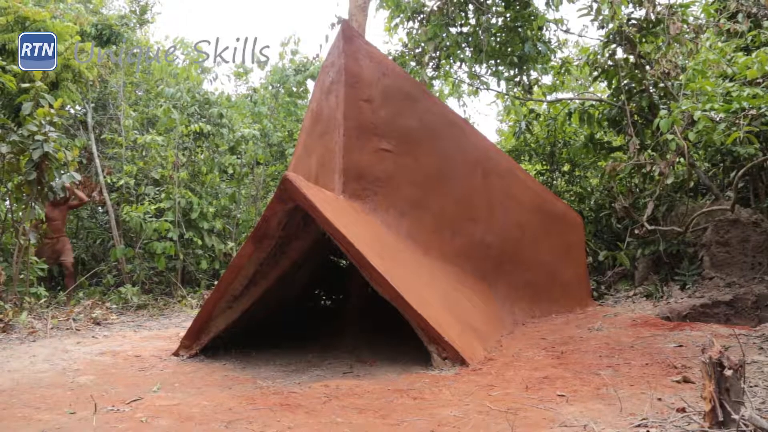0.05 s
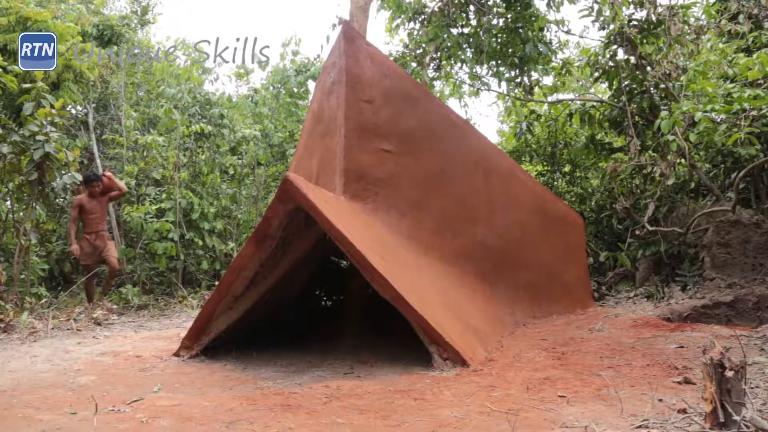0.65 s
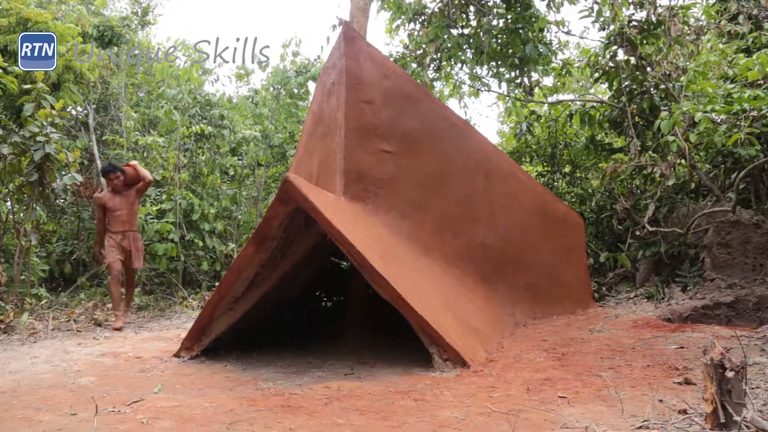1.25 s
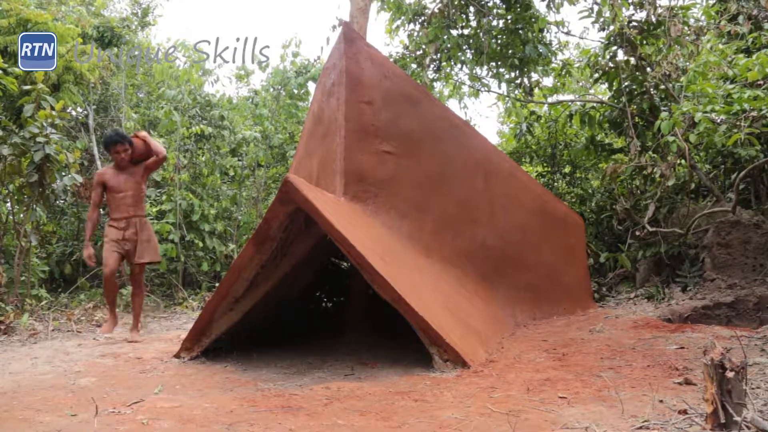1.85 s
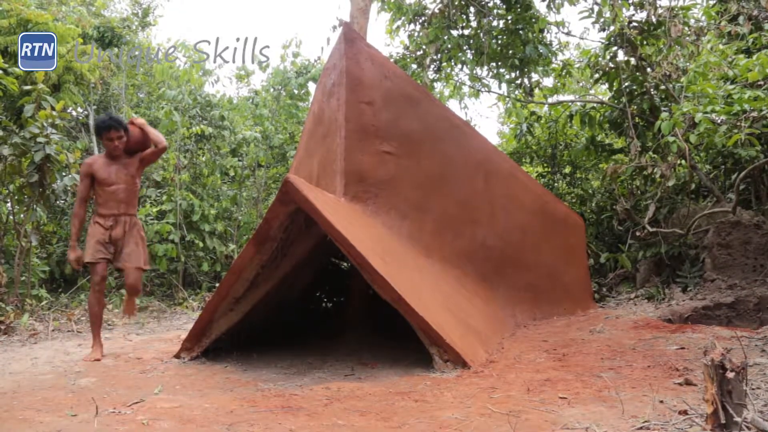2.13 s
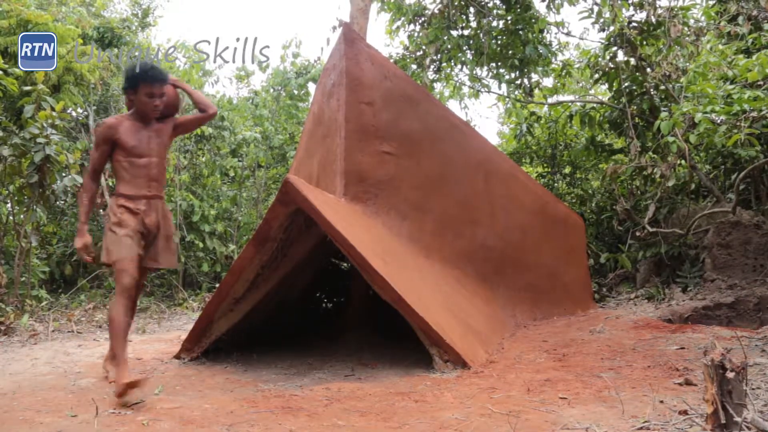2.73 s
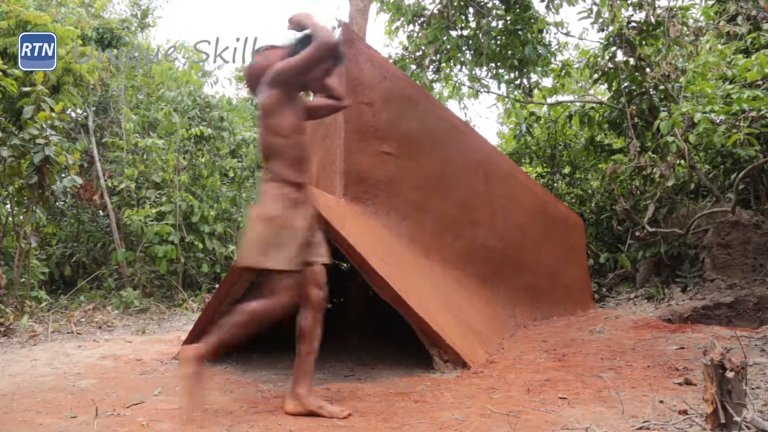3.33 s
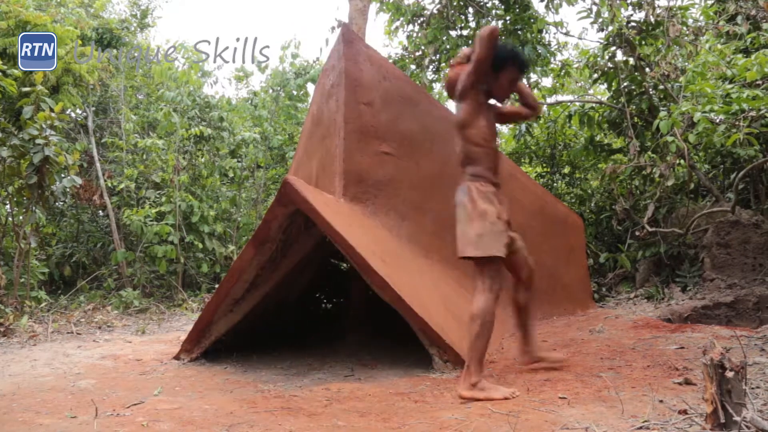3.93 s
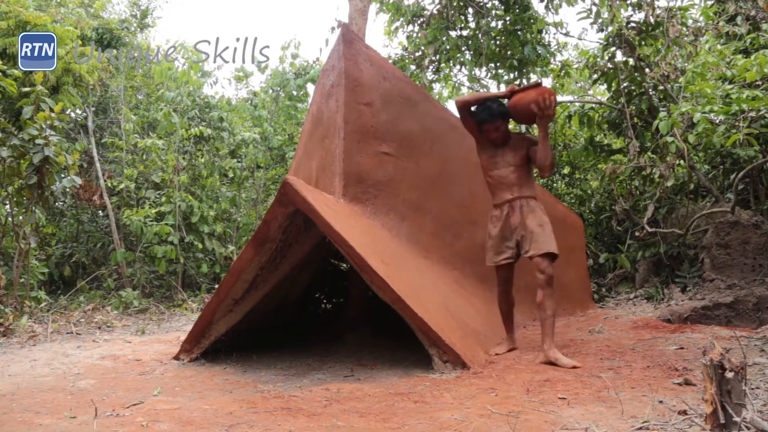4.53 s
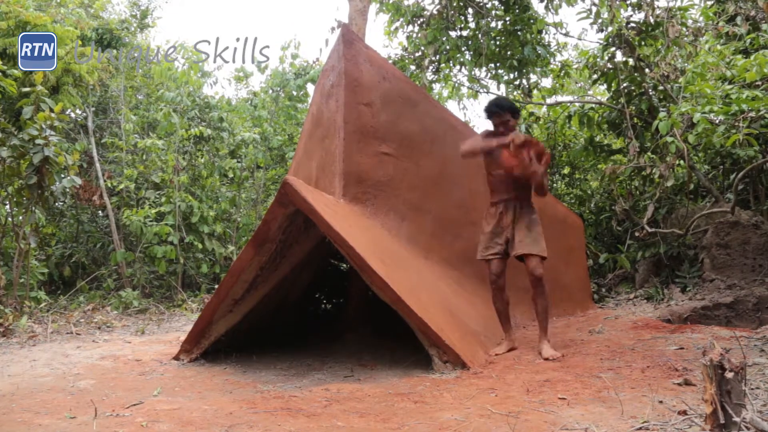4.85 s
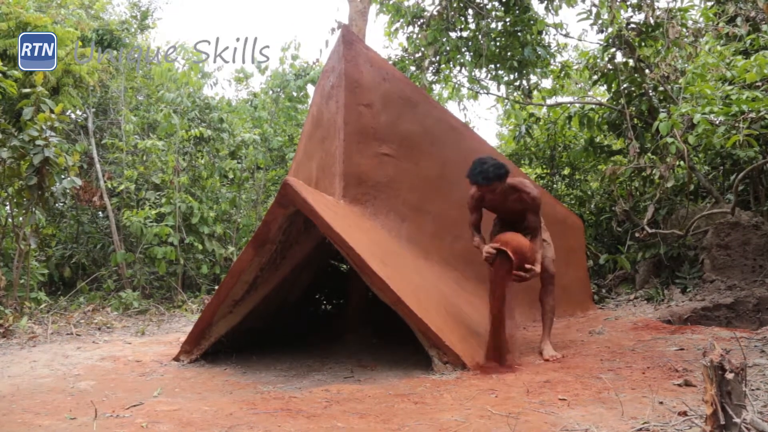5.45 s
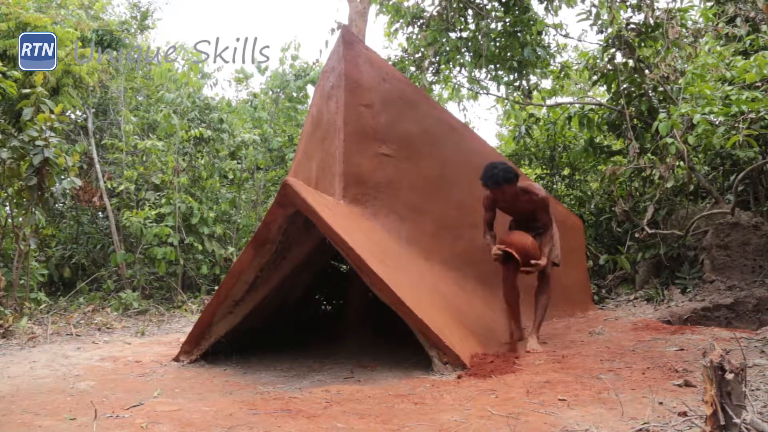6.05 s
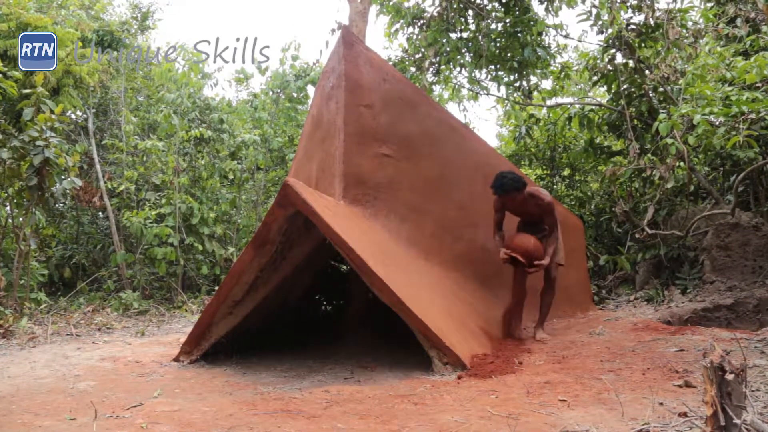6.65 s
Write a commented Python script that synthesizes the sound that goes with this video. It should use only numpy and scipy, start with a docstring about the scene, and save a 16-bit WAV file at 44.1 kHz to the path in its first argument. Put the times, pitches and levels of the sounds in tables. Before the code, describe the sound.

In a forest with a steady drone, dry ticks and a faint throbbing insect, a bird chirps once and leafy branches rustle, swelling to a loud swish. Soft barefoot steps and gritty scuffs follow. The bird returns with a short gliding phrase, and two sharp slaps land on a clay pot. Then loose dry soil is tipped onto the earth, trickling and pattering with small dull clods.

```python
"""Leaves swish and a small bird whistles as a barefoot man pushes through forest undergrowth.
He crosses a clearing with thudding heels, slaps a clay pot twice and tips out dry soil, whose crumbs
and clods patter on the ground. Rustle and patter are dense trains of random impacts; thuds and the
pot's ring are damped modes. The bird returns with five gliding notes, and behind it all are dry
ticking, a pulsing insect and a steady drone."""
import sys
import numpy as np
from scipy import signal
from scipy.fft import rfft, irfft
from scipy.io import wavfile
from scipy.ndimage import uniform_filter1d

SR = 44100
rng = np.random.default_rng(int(sys.argv[2]) if len(sys.argv) > 2 else 0)


def materialize(psi):
    """Save the field psi as 16-bit PCM at rate SR to the path in sys.argv[1].

    A 1-D psi becomes a single channel; in a 2-D psi each row is a channel.
    """
    bounded = np.clip(np.atleast_2d(psi).T, -1, 1)
    quanta = np.round(bounded * 32767).astype(np.int16)
    wavfile.write(sys.argv[1], SR, quanta)


N = 295029
T = np.arange(N) / SR


# spectrum of rustling leaves: f/Hz, relative level/dB
LEAF_SPECTRUM = [(40, -36), (80, -29), (150, -20), (420, -15.5), (550, -9.5), (900, -7.5), (1480, -1.5),
                 (2400, -4.5), (4240, 2), (6000, 3), (9260, -5), (15100, -15), (16000, -24)]
# twigs whipping back: t/s, relative level/dB, duration/s
TWIG_WHIPS = [(0.0, -30, 0.015), (.518, -25.5, 0.04), (.631, -31, 0.038), (.68, -33, 0.0098),
              (.922, -29.5, 0.053), (1.215, -22, 0.011), (1.24, -29.5, 0.012), (1.530, -17, 0.044),
              (1.629, -15, 0.0066), (1.641, -17.5, 0.0084), (1.671, -21.5, 0.032), (1.72, -26, 0.042),
              (2.135, -31.5, 0.028), (2.346, -33, 0.0065)]
def undergrowth():
    """Superposition of impacts: countless leaf contacts merge into a rustle as branches drag and whip."""
    leaves = grains(per_s=8000, spread_db=3.5) + 0.25 * grains(per_s=180, spread_db=-3.5)
    crackle = coloured(leaves, LEAF_SPECTRUM) * gain_of(1.2 * wander(47))
    whips = strokes(TWIG_WHIPS, rise=0.12)
    rustle = crackle * np.hypot(gain_of(4) * brushing(), gain_of(-3) * whips)
    return rustle + gain_of(-14) * forest_echoes(rustle, t60=0.095)


# leafy branches dragged along the body: t/s, duration/s, relative level/dB
BRANCH_DRAGS = [(-0.02, 0.13, -47), (0.315, 0.031, -41.5), (0.41, 0.28, -43), (0.785, 0.23, -46.5),
                (1.11, 0.15, -46), (1.34, 0.026, -38.5), (2.49, 0.037, -55)]
def brushing(bush_s=1.601):
    """Incoherent sources add in power: the envelope of single branches, a thick bush and settling leaves."""
    before, after = np.maximum(bush_s - T, 0), np.maximum(T - bush_s, 0)
    swell = gain_of(-74 * before)  # slopes in dB/s
    fade, settling = gain_of(-29 - 64 * after), gain_of(-42 - 21 * after)
    branches = held(BRANCH_DRAGS, attack_s=0.014, release_s=0.047)
    return np.hypot(branches, swell * np.hypot(fade, settling))


# rubs of soles and cloth: t/s, level/dB, duration/s
SCUFF_STROKES = [(2.925, -39, 0.017), (3.255, -53, 0.0091), (3.33, -46, 0.0099), (3.585, -41, 0.049),
                 (3.705, -35, 0.023), (3.748, -40, 0.01), (4.145, -43.5, .03), (4.452, -49, 0.091),
                 (4.872, -40, 0.047), (5.2, -46, 0.026), (5.575, -49, 0.045), (5.82, -43, 0.05),
                 (6.228, -45, 0.037), (6.425, -39, 0.084)]
# their spectrum: f/Hz, relative level/dB
SCUFF_SPECTRUM = [(300, -7), (1500, 4), (4000, 9.5), (7000, 2), (10500, -6), (13000, -9), (16000, -21)]
def scuffs():
    """Friction noise: sliding soles and cloth catch in many tiny, gritty contacts."""
    return strokes(SCUFF_STROKES, rise=0.073) * coloured(grains(per_s=6400, spread_db=3.5), SCUFF_SPECTRUM)


# heels and heavy clods on packed earth: t/s, level/dB, f/Hz
EARTH_IMPACTS = [(0.896, -50, 96), (1.145, -37.5, 226), (2.89, -48, 80), (2.894, -34, 272),
                 (3.709, -24, 590), (3.709, -34.5, 270), (4.072, -34, 310), (5.444, -24.5, 370),
                 (5.776, -37.5, 186), (6.055, -29.5, 250), (6.214, -35, 217), (6.361, -18, 624),
                 (6.477, -33.5, 224)]
# the earth's give under them: frequency ratio, relative level/dB
EARTH_MODES = [(1, 0), (0.534, -16)]
def thuds(decay_cycles=13.3):
    """Constant-Q damping: each mode of the struck earth falls 60 dB in the same number of cycles."""
    out, t = np.zeros(N), np.arange(SR // 4) / SR
    onset = 1 - np.exp(-t / 0.004)
    for s, db, pitch in EARTH_IMPACTS:
        for ratio, mode_db in EARTH_MODES:
            hz = ratio * pitch
            rumble = unit_rms(resonate(rng.standard_normal(len(t)), hz, 0.76 * hz))
            push = np.sin(2 * np.pi * hz * t) + 0.45 * rumble
            add(out, s, gain_of(db + mode_db - 60 * t * hz / decay_cycles) * push * onset)
    return out


# hollow ring of the clay pot: f/Hz, relative level/dB, T60/s
CLAY_MODES = [(335, -6.5, 0.077), (905, 0, 0.023), (1230, 5, 0.03), (1990, -4, 0.043)]
# slaps: t/s, level/dB, f/Hz, bandwidth/Hz, relative tail level/dB, tail T60/s, ring level/dB
HAND_SLAPS = [(4.7252, -9.5, 3580, 2400, -24, 0.15, -34), (5.0452, -10.5, 2450, 1220, -12.5, 0.022, -46)]
def pot():
    """Free vibration: a hand's sharp slap leaves the full pot ringing briefly in its damped modes."""
    out, t = np.zeros(N), np.arange(SR // 6) / SR
    ring = sum(gain_of(db - 60 * t / t60) * np.sin(2 * np.pi * hz * t) for hz, db, t60 in CLAY_MODES)
    for s, db, hz, width, tail_db, t60, ring_db in HAND_SLAPS:
        add(out, s, knock(db, hz, width, tail_db, t60))
        add(out, s, gain_of(ring_db) * ring)
    return out


# spectrum of landing soil: f/Hz, relative level/dB
SOIL_SPECTRUM = [(40, -30), (80, -16), (140, -9), (300, -1), (400, -7.5), (470, -10), (640, 0.5),
                 (1000, -4.5), (1600, -3), (2300, -7), (4300, -4.5), (8000, -20), (13000, -23),
                 (16000, -44)]
# one surge for each tip or shake of the pot: t/s, duration/s, relative level/dB
SOIL_SURGES = [(5.325, 0.18, -43.5), (5.66, 0.19, -52.5), (6.04, 0.17, -57.5), (6.21, 0.063, -46.5),
               (6.34, 0.07, -49.5), (6.52, 0.15, -53)]
def soil(trickle_start_s=5.32):
    """Shot noise: fine crumbs hiss and larger ones patter, landing in surges over a thin trickle."""
    crumbs, lumps = grains(per_s=7000, spread_db=2.8), grains(per_s=420, spread_db=2.6)
    stream = coloured(crumbs + 1.2 * lumps, SOIL_SPECTRUM)
    surges = held(SOIL_SURGES, attack_s=0.015, release_s=0.019)
    trickle = gain_of(-57) * (T > trickle_start_s)
    return np.hypot(surges, trickle) * stream * gain_of(5 + 2.84 * wander(57))


# twigs and grit snapping, and a foot's sharp slap at 3.71 s: t/s, level/dB, f/Hz
TWIG_SNAPS = [(1.147, -19.5, 3050), (1.162, -18, 3500), (1.974, -21, 6000), (2.1942, -27, 5660),
              (2.926, -29, 3500), (3.7114, -20.5, 1000), (5.393, -17.5, 1660), (5.4353, -17, 2600)]
# clods bursting on the ground: t/s, level/dB, f/Hz
CLOD_BURSTS = [(5.3158, -19.5, 925), (5.468, -21.5, 1790), (5.510, -23, 1390), (6.102, -26, 945),
               (6.2142, -23.5, 690), (6.233, -21, 1370), (6.287, -24.5, 1200), (6.32, -25.5, 630),
               (6.36, -21, 800), (6.387, -25.5, 800), (6.518, -23.5, 3050), (6.532, -24, 700),
               (6.558, -27.5, 800), (6.63, -25.5, 644), (6.638, -31, 745)]
def snaps_and_clods():
    """Brittle fracture: twigs and grit snap cleanly and a foot slaps sharply; clods land duller and crumble in
    a stronger tail."""
    out = np.zeros(N)
    for s, db, hz in TWIG_SNAPS:
        add(out, s, knock(db, hz, width_hz=hz, tail_db=-19.5, t60=0.043))
    for s, db, hz in CLOD_BURSTS:
        add(out, s, knock(db, hz, width_hz=1.15 * hz, tail_db=-9, t60=0.032))
    return out


# arched notes: start t/s, crest t/s, end t/s, relative level/dB at opening and at crest,
# opening foot f/Hz, crest f/Hz, closing foot f/Hz, rise time/s
BIRD_NOTES = [(0.0, 0.1, 0.175, -44, -43, 2490, 2720, 1780, 0.04),
              (3.85, 3.945, 4.048, -51, -47, 1850, 2630, 2600, 0.1),
              (4.185, 4.282, 4.405, -48, -42, 2810, 3020, 2440, 0.028),
              (4.495, 4.517, 4.55, -48, -47.5, 2120, 2180, 1300, 0.02),
              (4.592, 4.71, 4.718, -46, -44, 1250, 3060, 3000, 0.118),
              (4.78, 4.94, 5.003, -52, -42.5, 2330, 2660, 1750, 0.06)]
def bird(fall_s=0.049, closing_db=-3.5):
    """Frequency modulation: a nearly pure whistle arches over a crest, quavers and echoes off the trees."""
    song, quaver = np.zeros(N), 1 + 0.0059 * wander(120)
    for start, crest, end, open_db, crest_db, open_hz, crest_hz, close_hz, rise_s in BIRD_NOTES:
        t = np.arange(start, end, 1 / SR) - crest
        opening = [open_hz, rise_s, crest - start, open_db - crest_db]
        closing = [close_hz, fall_s, end - crest, closing_db]
        foot_hz, glide_s, span_s, edge_db = np.where(t[:, None] < 0, opening, closing).T
        pitch = (foot_hz + (crest_hz - foot_hz) * np.exp(-(t / glide_s) ** 2)) * quaver[:len(t)]
        tone = np.sin(2 * np.pi * np.cumsum(pitch) / SR) * signal.windows.tukey(len(t), .12)
        add(song, start, np.sqrt(2) * gain_of(crest_db + edge_db * (t / span_s) ** 2) * tone)
    song *= gain_of(2 * wander(41))  # the level flutters
    return gain_of(-2.5) * song + gain_of(-6.5) * forest_echoes(song, t60=0.35)


# dry ticks of equal strength: t/s
TICK_TIMES = [0.233, 0.2712, 0.3073, 0.4424, 0.733, 0.8378, 1.0164, 1.0482, 2.537, 2.642, 2.9954, 3.1322,
              3.2823, 3.3547, 3.4188, 3.5238, 3.6713, 3.882, 4.0564, 4.126, 4.225, 4.2598, 4.371, 4.447,
              4.655, 4.8299, 5.0663, 5.1493, 5.2817, 5.7555, 5.7857, 5.82, 6.0402, 6.066, 6.6008]
def ticking(tick_db=-39.5, faint_db=-46, faint_per_s=5, whirr_db=-55):
    """Impulsive excitation: rasping ticks, fainter random ones and a fine whirr ring the same resonances."""
    t = np.arange(SR // 50) / SR
    whirr = grains(per_s=900, spread_db=2.8)
    out = gain_of(whirr_db + wander(18)) * unit_rms(tick_body(whirr))
    faint_times = rng.uniform(0, T[-1], int(faint_per_s * T[-1]))
    for times, db in (TICK_TIMES, tick_db), (faint_times, faint_db):
        for s in times:
            rasp = tick_body(rng.choice([-1, 1], len(t)) * np.exp(-t / .0042))
            onset_rms = np.sqrt(np.mean(rasp[:SR // 200] ** 2))  # first 5 ms
            add(out, s + 0.00099, gain_of(db) * rasp / onset_rms)
    return out


# resonances of the ticks and whirr: f/Hz, bandwidth/Hz, relative level/dB
TICK_RESONANCES = [(1195, 370, 0), (1402, 75, 10.5), (1741, 56, 10), (2100, 120, -12), (2155, 144, 4.5),
                   (2880, 59, 3.5), (3243, 100, 9.5), (3800, 100, 5), (3770, 180, 0), (4254, 140, 6),
                   (4865, 96, 10.5), (4930, 960, 2)]
def tick_body(drive):
    """Modal superposition: parallel resonances of alternating polarity colour the ticking."""
    rung = sum(gain_of(db) * resonate(drive, hz, width) * (-1) ** k
               for k, (hz, width, db) in enumerate(TICK_RESONANCES))
    return signal.sosfilt(signal.butter(2, [1000, 6000], "band", fs=SR, output="sos"), rung)


# the insect's pulsing: t/s, throb rate/Hz
INSECT_THROBS = [(0, 5.6), (3.4, 5.72), (3.7, 5.2), (4.6, 5.35), (6.69, 5.6)]
def insect(pitch_hz=5550, swing_hz=340, crest_s=3.47, db=-57):
    """Joint amplitude and frequency modulation: a narrow-band buzz swells and rises with each throb."""
    cycles = np.cumsum(np.interp(T, *np.transpose(INSECT_THROBS))) / SR
    throb = np.cos(2 * np.pi * (cycles - np.interp(crest_s, T, cycles)))
    carrier = np.exp(2j * np.pi * np.cumsum(pitch_hz + swing_hz * throb) / SR)
    buzz = ((wander(800) + 1j * wander(800)) * carrier).real  # a noise band around the carrier
    buzz = signal.sosfilt(signal.butter(12, 6500, fs=SR, output="sos"), buzz)
    swell = gain_of(2.6 * throb + 1.1 * wander(12))
    return gain_of(db) * unit_rms(buzz * swell)


# spectrum of the forest's drone: f/Hz, relative level/dB
DRONE_SPECTRUM = [(15, -40), (25, -13), (45, -8.5), (66, 1.5), (115, 2), (300, -2), (420, -3.5),
                  (620, -2.5), (1100, -7), (1650, 1.5), (2550, -11.5), (3250, 0.5), (3920, -12.5),
                  (4250, -1.5), (4610, -29), (5600, -4.5), (7110, -19.5), (14000, -24), (16000, -24)]
def drone(db=-50.5):
    """Broadband noise: the distant wash of the forest, wavering slightly in level."""
    return gain_of(db + 1.9 * wander(21)) * coloured(rng.standard_normal(N), DRONE_SPECTRUM)


def forest_echoes(x, t60):
    """Scattering: trunks and foliage return sparse echoes that build up and decay exponentially."""
    t = np.arange(SR // 2) / SR
    echoes = rng.standard_normal(len(t)) * (rng.random(len(t)) < .05)
    echoes *= gain_of(-60 * t / t60) * (1 - np.exp(-t / 0.0096))
    return signal.fftconvolve(x, echoes / np.linalg.norm(echoes))[:N]


def knock(db, hz, width_hz, tail_db, t60):
    """Impulse response: a heavily damped blow, then a short tail of grit and near reflections."""
    t = np.arange(SR // 8) / SR
    contact = np.exp(-(SR * t - 6) ** 2 / 5)
    blow = resonate(contact, hz, width_hz)
    grit = uniform_filter1d(rng.choice([-1., 1.], len(t)), size=3)
    tail = unit_rms(resonate(grit, hz, .75 * width_hz))
    tail *= gain_of(tail_db - 60 * t / t60) * (1 - np.exp(-t / 0.00076))
    return gain_of(db) * (blow / abs(blow).max() + tail)


def grains(per_s, spread_db):
    """Poisson impacts at rms 1; a positive spread makes a few larger, a negative one a few smaller."""
    size = gain_of(spread_db * np.minimum(rng.exponential(1, N), 4))
    return unit_rms(size * rng.choice([-1, 1], N) * (rng.random(N) < per_s / SR))


def strokes(rows, rise):
    """Envelope of short rubs with Gaussian decay; the rise is a fraction of each duration."""
    out = np.zeros(N)
    for s, db, length in rows:
        progress = np.arange(int(3 * length * SR)) / (length * SR)
        add(out, s, gain_of(db) * (1 - np.exp(-progress / rise)) * np.exp(-progress ** 2))
    return out


def held(rows, attack_s, release_s):
    """Envelope of sounds that build up, hold and decay exponentially."""
    out = np.zeros(N)
    for s, length, db in rows:
        t = np.maximum(T - s, 0)
        out += gain_of(db) * (1 - np.exp(-t / attack_s)) * np.exp(-np.maximum(t - length, 0) / release_s)
    return out


def resonate(x, hz, width_hz):
    """A second-order resonator with a peak gain of 1."""
    r = np.exp(-np.pi * width_hz / SR)
    feedback = [1, -2 * r * np.cos(2 * np.pi * hz / SR), r * r]
    return signal.lfilter(np.array([1, 0, -1]) * (1 - r * r) / 2, feedback, x)


def coloured(x, spectrum):
    """Spectral shaping, interpolated over log frequency, at rms 1."""
    hz, db = np.transpose(spectrum)
    shape_db = np.interp(np.log(np.fft.rfftfreq(N, 1 / SR) + 1), np.log(hz), db)
    return unit_rms(irfft(rfft(x) * gain_of(shape_db), N))


def wander(cutoff_hz):
    """Random fluctuation: low-passed Gaussian noise at rms 1."""
    lowpass = np.exp(-(np.fft.rfftfreq(N, 1 / SR) / cutoff_hz) ** 2)
    return unit_rms(irfft(rfft(rng.standard_normal(N)) * lowpass, N))


def gain_of(db):
    """Decibels to amplitude."""
    return 10 ** (np.asarray(db) / 20)


def unit_rms(x):
    """Normalisation to rms 1."""
    return x / np.sqrt(np.mean(x ** 2) + 1e-20)


def add(mix, s, sound):
    """Superposes a sound on the mix at s seconds."""
    part = mix[max(round(s * SR), 0):][:len(sound)]
    part += sound[:len(part)]


def scene():
    """Linear superposition: the forest and the man's sounds sum in one channel."""
    forest = drone() + ticking() + insect() + bird()
    man = undergrowth() + scuffs() + thuds() + snaps_and_clods() + pot() + soil()
    return (forest + man)[None]


def record(dry, cutoff_hz=15950):
    """Band limiting: a linear-phase low-pass removes the highest treble."""
    lowpass = signal.firwin(511, cutoff_hz, window=("kaiser", 9), fs=SR)
    return signal.oaconvolve(dry, lowpass[None], "same")


dry = scene()
out = record(dry)
materialize(out)
```